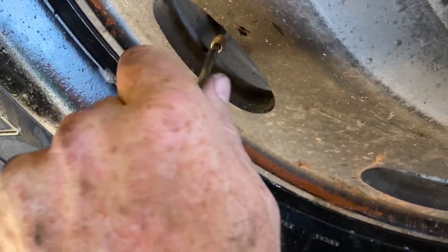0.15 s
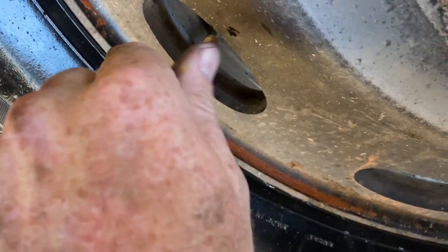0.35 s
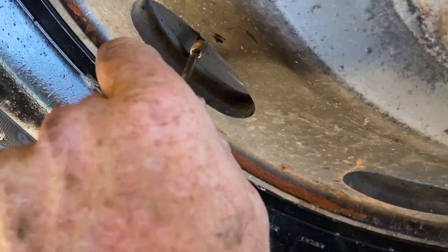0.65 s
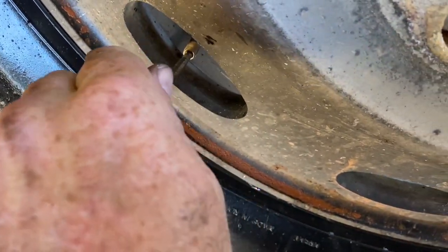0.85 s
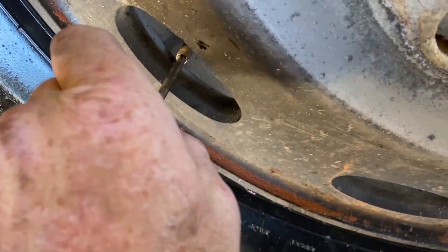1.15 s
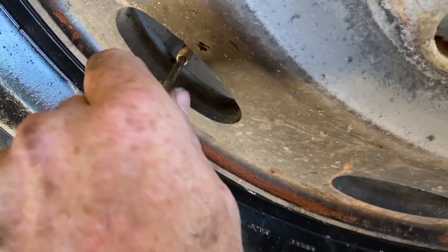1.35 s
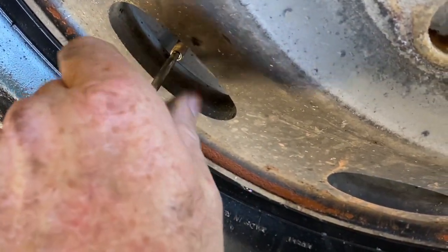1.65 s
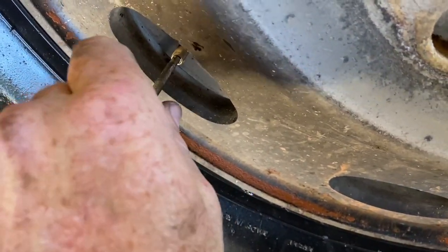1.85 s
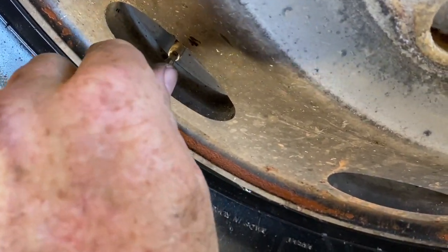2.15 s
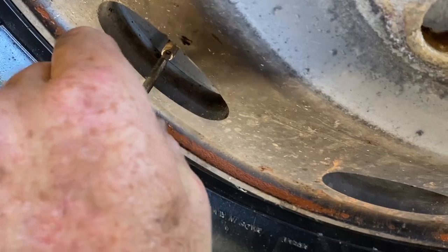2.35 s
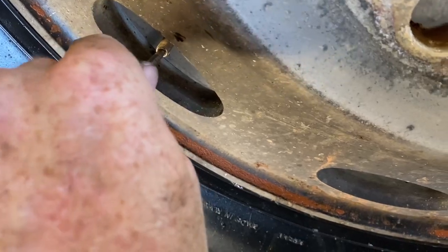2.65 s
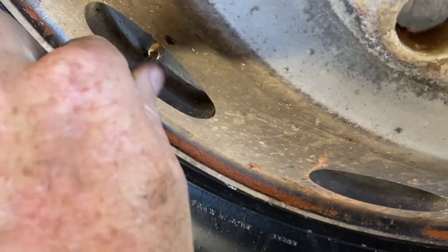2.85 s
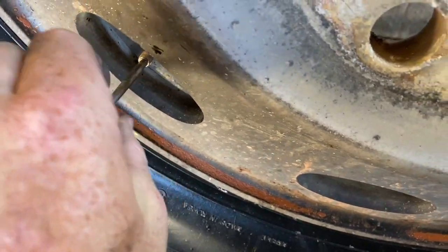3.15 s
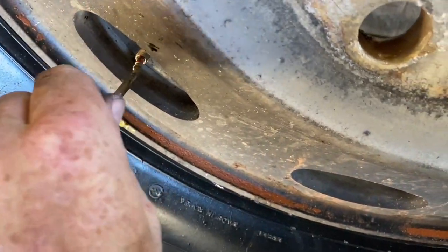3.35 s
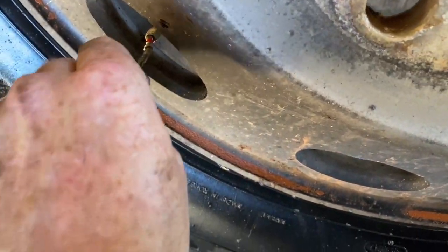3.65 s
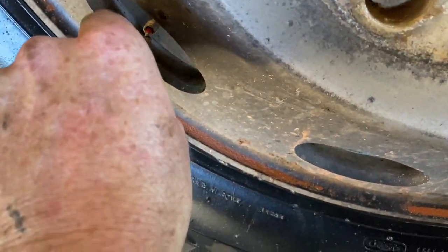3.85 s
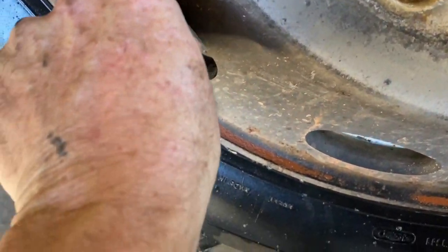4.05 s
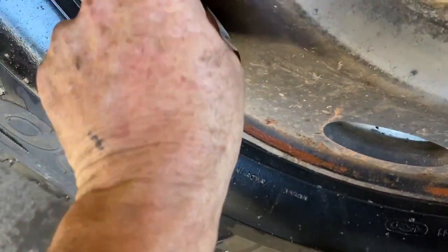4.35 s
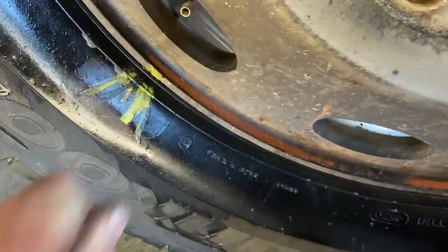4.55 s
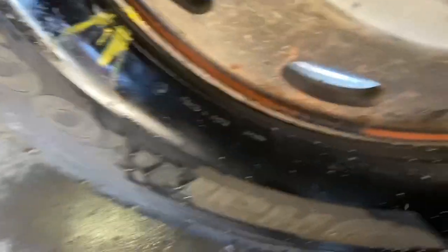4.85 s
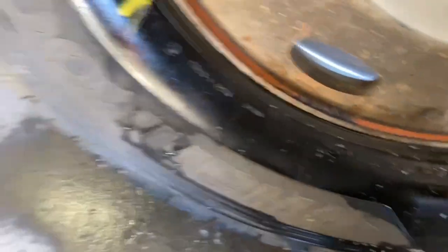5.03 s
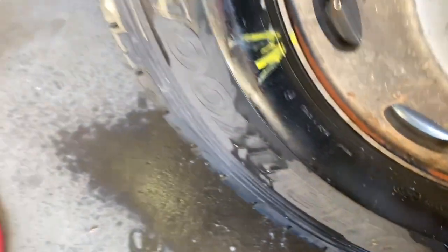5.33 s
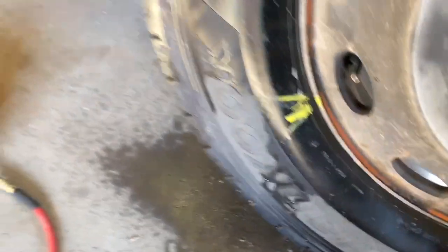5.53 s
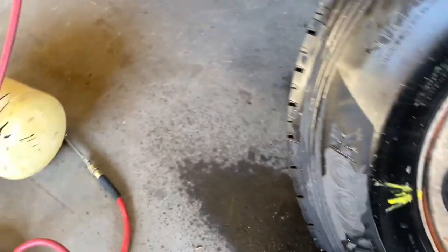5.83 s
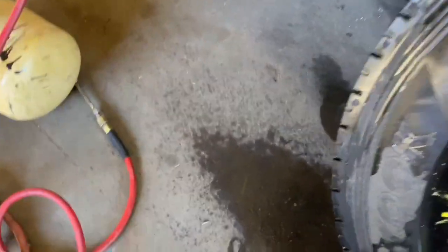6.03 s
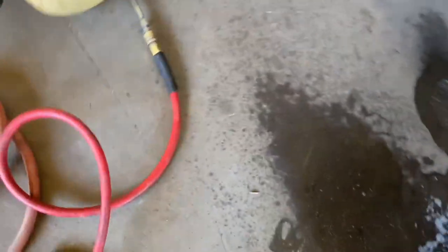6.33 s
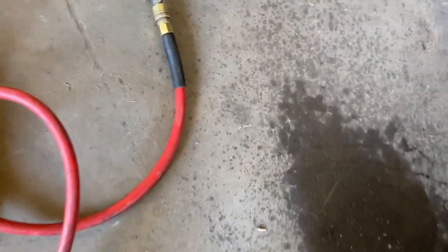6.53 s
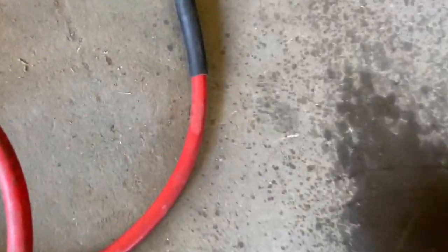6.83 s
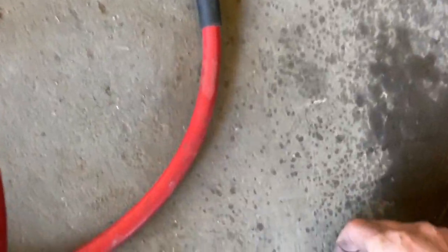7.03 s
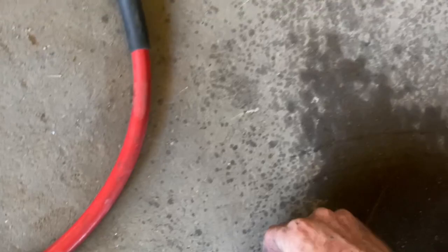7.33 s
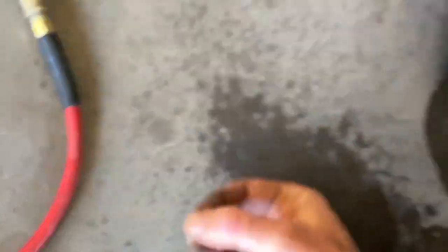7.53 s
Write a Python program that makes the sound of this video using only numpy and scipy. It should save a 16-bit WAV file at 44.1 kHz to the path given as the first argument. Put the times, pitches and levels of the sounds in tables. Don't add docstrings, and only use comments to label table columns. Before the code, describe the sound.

In a workshop, a valve core is twisted loose: spurting hiss, clicks, a pop, loud rushing air, a brief pinched squeal, then steady blowing.

```python
import sys
import numpy as np
from scipy import signal
from scipy.fft import rfft, irfft, next_fast_len
from scipy.io import wavfile
from scipy.ndimage import uniform_filter1d

SR = 44100
rng = np.random.default_rng(int(sys.argv[2]) if len(sys.argv) > 2 else 0)


def natural_amplitude(level_db):
    exponent = np.asarray(level_db, float) / 20
    return 10 ** exponent


def waveform_to_disk(signal):
    frames = np.transpose(np.atleast_2d(signal))
    scaled = np.clip(frames, -1, 1) * 32767
    samples = np.round(scaled).astype(np.int16)
    wavfile.write(sys.argv[1], SR, samples)


N = 338675
TIME = np.arange(N) / SR
SIZE = next_fast_len(N)
FREQ = np.arange(SIZE // 2 + 1) * SR / SIZE

# (time [s], flow as treble level [dB], opening of the stem [0-1],
# spread of the jet over wheel and floor [0-1], fullness [0-1])
VALVE_FLOW = [(0, -40, 0.37, 0.07, 0), (2.2, -34.5, 0.48, 0.13, 0.21), (2.5, -32.5, 0.23, 0.05, 0),
              (3.21, -34.5, 0.52, 0.15, 0.27), (3.28, -24, 0.74, 0.54, 1), (3.47, -24.5, 1, 0.8, 0.81),
              (3.87, -24.5, 1, 0.77, 0.77), (3.95, -29.5, 0.84, 0.8, 1.04), (4.0, -37.5, 0.6, 0.1, 1),
              (4.155, -37.5, 0.5, 0.1, 1.01), (4.17, -32, 0.5, 0.35, 1), (4.37, -33, 1, 0.8, 0.94),
              (4.4, -25.5, 0.8, .95, 0.53), (4.47, -26.5, .99, 1.1, 0.78), (4.5, -27, 0.98, 1.2, 1.04),
              (6.3, -30.5, 0.79, 1.04, 0.93), (7.5, -31.5, 1, .8, 1), (7.62, -27.5, 0.77, .6, 0.51)]
# (time [s], turn [0-1], loss [dB])
PHONE_TURN = [
    (0, 0.63, 0),
    (6.3, 0.19, 0),
    (6.5, 0, -4.5),
    (6.54, 1, -7),
    (6.62, 1, -9),
    (6.95, 0.85, -11.5),
    (7.48, 0.78, -9.5),
    (7.6, 0.6, -8.5),
    (7.68, 0, -6),
]


def curves(table):
    s, *columns = np.transpose(table)
    return [np.interp(TIME, s, column) for column in columns]


def walk(rate):
    hold = int(SR / rate)
    steps = np.repeat(rng.standard_normal(N // hold + 1), hold)[:N]
    return 1.3 * uniform_filter1d(uniform_filter1d(steps, hold), hold)


def bumps(table, attack, release):
    out = 0
    for s, length, *strengths in table:
        end = s + max(length, attack)
        corners = [s - attack / 2, s + attack / 2, end, end + release]
        out = out + np.outer(strengths, np.interp(TIME, corners, [0, 1, 1, 0]))
    return out


def gate(table, edge_s, offset=0):
    inside = np.minimum(TIME - table[0][0], table[-1][0] - TIME)
    return np.clip(inside / edge_s + offset, 0, 1)


def flow():
    # (time [s], length [s], extra hiss [dB], extra roar [dB])
    twists = [(0, 0.079, 4, 5), (0.141, 0.053, 4.5, 10), (0.201, 0.052, 9.5, 3.5), (0.715, .23, 8.5, 1),
              (0.797, 0.073, -1.5, 7.5), (0.882, 0.038, 3, 2), (1.03, 0.11, 10.5, 11.5),
              (1.176, 0.087, 2.5, 10.5), (1.267, 0.15, 8.5, 14), (1.33, 0.081, -0.5, -2.5),
              (1.43, 0.18, -0.1, 12.5), (1.646, 0.095, 4.5, 11), (1.741, 0.15, -2.5, 12.5),
              (1.98, 0.057, 2, 8), (2.123, 0.094, 1, 5.5), (2.3, 0.097, 1.5, 2.5), (2.352, 0.043, 3, 9),
              (2.413, 0.075, 0.8, 8), (2.496, 0.416, 2, 9.5), (2.988, 0.089, 2.5, 0),
              (3.136, .02, 0.5, 12.5), (3.207, 0.27, -0.5, 6), (3.26, 0.072, 2.5, -0.5),
              (3.981, 0.18, -1.7, -11.5), (4.218, 0.055, 4, -8), (4.378, .09, -0.5, -1),
              (4.496, 0.056, -0.7, 4), (7.541, .2, -0.8, 6), (7.6, .2, 1, 0), (1.357, .02, 3, -1.5)]
    # (time [s], level against the flow [dB])
    draught = [(0, -16), (.7, -11.5), (1.2, -11), (1.6, -20.5), (1.66, -34), (2.3, -28), (2.85, -12.5),
               (2.95, -14), (3.4, -18), (3.97, -18.5), (4.01, -33), (4.15, -40), (4.21, -7.5), (4.35, -27),
               (4.5, -9.5), (6.5, -10.5), (6.64, -28.5), (7.3, -29.5)]
    # (time [s], length [s], boost [dB])
    buffets = [(.247, 0.015, 10), (.838, 0.045, 17), (1.12, .03, -1), (1.28, 0.12, 15), (1.48, 0.037, 14),
               (1.55, 0.032, 11), (3.137, 0.04, 4.5), (3.26, 0.083, 12), (4.42, 0.034, 12.5),
               (5.0, 0.29, 5), (6.49, 0.065, 9.5), (6.74, 0.056, 4), (7.54, .03, 6.5), (7.61, 0.18, 12)]
    twist_attack_s, twist_release_s = 0.015, 0.036
    # against the treble for a thin leak and a full jet [dB], shares of hiss and roar,
    # start [s], length [s] and depth [dB] of the shadow as the phone turns (presence fades, then body drops out)
    middle_ranges = [(-12.5, 1, 0.98, 0.32, 6.36, .13, -4), (-18.5, -7, 0.45, 1.067, 6.505, .025, -14.5)]

    treble, _, _, full = curves(VALVE_FLOW)
    treble = treble + curves(PHONE_TURN)[1]
    shortened = [(s, length - twist_release_s / 2, a, b) for s, length, a, b in twists]
    hiss, roar = bumps(shortened, twist_attack_s, twist_release_s)
    middle = []
    for thin_db, full_db, hiss_share, roar_share, shadow_from_s, shadow_s, shadow_db in middle_ranges:
        db = treble + thin_db + full * (full_db - thin_db)
        db = db + hiss_share * hiss + roar_share * roar
        middle.append(db + shadow_db * np.clip((TIME - shadow_from_s) / shadow_s, 0, 1))
    rumble = treble + curves(draught)[0] + bumps(buffets, 0.014, 0.044)[0]
    return np.array([treble + hiss, *middle, rumble])


def spurts():
    # (time [s], boost [dB], length [s])
    slips = [(1.03, 2, 0.004), (1.044, 4, .004), (1.278, -5, .012), (1.987, 5, 0.025), (2.122, 6.5, 0.011),
             (2.134, 4, .003), (3.133, 10, 0.009), (1.191, 5.5, .005), (1.203, 1, .002), (1.413, 6, .005),
             (1.905, 1.5, 0.035), (2.179, -2.5, .012), (2.239, 8, .001), (2.241, 9, .0012), (2.28, 7, .001),
             (2.315, 3.5, .003), (2.613, 4.5, .0015), (2.69, 7.5, .002), (2.869, 2.5, 0.013),
             (4.51, 3, 0.0014), (3.221, 4.5, 0.034), (3.277, 3, 0.03), (4.164, 2, 0.024), (4.312, 2, 0.049)]
    out = 0
    for s, db, length in slips:
        since = np.maximum(TIME - s, 0)
        out = out + db * (TIME > s) * np.exp(-(since / length) ** 2)
    return out


def colour(table, hz, column=1):
    table = np.array(table)
    return np.interp(np.log(hz), np.log(table[:, 0]), table[:, column])


def jet(ranges):
    range_hz = [11500, 4200, 900, 130]
    range_width_hz = [6200, 5200, 1100, 300]
    # (pitch [Hz], level [dB])
    leak_colour = [(40, -2), (80, -1), (250, -3), (700, 4), (1050, -1), (1400, -4.5), (2000, -5.5),
                   (3300, -1.5), (5000, -1), (6200, -5.5), (7500, -4), (9500, 6.5), (11500, 2), (14000, 4)]
    open_colour = [(40, -8), (90, -1), (250, -0.5), (600, -2), (1500, 1.5), (2500, 2), (4000, 1),
                   (6000, -0.5), (7500, 1), (9200, 1), (11000, 2), (12700, -1), (14000, 0.5), (15500, 0)]
    # (pitch [Hz], level [dB])
    away_colour = [(40, -2), (120, 1.5), (400, -5), (1000, 0.2), (2200, -1.5), (3300, -1.5), (5000, 0.6),
                   (7300, 2.98), (12000, 0.16), (15500, 1.35)]
    # (pitch [Hz], share with the jet held narrow [0-1], share with it spread
    scatter = np.array([(39.9, .05, 0.26), (300, 0.043, 0.31), (900, 0.053, 0.73), (1380, 0.13, 0.93),
                        (1640, .015, 1), (1930, 0.018, 1), (2430, 1, 0.82), (2914, .03, 1),
                        (3700, .01, 0.64), (4550, 0.16, 1), (5010, 0.48, 0.75), (5900, 0.033, 0.428),
                        (6400, 0.0295, 0.67), (7100, 0.7, 0.91), (8000, .08, .25), (8250, .015, .06),
                        (8600, .01, .03), (9000, 0.03, 0.06), (9800, 0.0049, 0.0037),
                        (10340, 0.0022, 0.002)])
    # (time [s], length [s], pitch [Hz], width [Hz], level [dB])
    shadings = [(0, 0.87, 6540, 560, 5), (1.29, 0.12, 14000, 3000, 3), (.7, .22, 2000, 250, -6),
                (2.15, .75, 1800, 200, -4), (4.4, .2, 3100, 600, -2), (1.95, 0.21, 2230, 430, 6),
                (6.416, 0.086, 400, 330, 3), (2.96, 0.22, 13000, 3000, 3), (3.5, .03, 2650, 700, 3.5),
                (3.24, .035, 2400, 900, 3), (3.99, 0.15, 4400, 400, 1), (3, 0.56, 5870, 500, 1.5),
                (3, 0.69, 8970, 630, 5.5), (3.302, 0.78, 15000, 2500, -1), (3.354, 0.21, 1530, 400, 0),
                (4.5, 0.11, 6050, 500, 5.5), (5, 0.4, 6070, 500, 3), (4.5, .2, 3700, 640, 3.5),
                (4.178, .19, 1490, 330, 5.5), (6.193, 0.23, 520, 500, 2.5), (6.403, 0.15, 3200, 2200, -1.5),
                (0, .08, 5500, 1500, -1), (7, 0.87, 10000, 1300, -1.5), (6.551, 1, 1750, 420, -1.5),
                (6.863, 0.46, 370, 250, -4.5)]
    spit_db, flicker_db, gust_db, band_count = .6, 1.3, .5, 32

    density = ranges - 10 * np.log10(range_width_hz)[:, None]
    opening, spread = (np.clip(c, 0, 1) for c in curves(VALVE_FLOW)[1:3])
    turn = curves(PHONE_TURN)[0]
    noise = rfft(rng.standard_normal((3, SIZE))) * np.sqrt(SR / 2)
    pitch = np.log(FREQ + 300)
    centres = np.linspace(np.log(340), np.log(16300), band_count)
    spacing = centres[1] - centres[0]
    spit, gust, spurt = walk(70), walk(12), spurts()
    shades = np.array([bumps([(s, length, db)], .025, .025)[0] for s, length, _, _, db in shadings])
    shade_hz, shade_width = np.transpose(shadings)[2:4]

    straight, scattered = 0, 0
    for centre in centres:
        hz = np.exp(centre) - 300
        place = np.interp(-np.log(hz), -np.log(range_hz), np.arange(4))
        k = min(int(place), 2)
        db = density[k] + (place - k) * (density[k + 1] - density[k])
        leak_db, open_db = colour(leak_colour, hz), colour(open_colour, hz)
        db = db + leak_db + opening * (open_db - leak_db) + turn * colour(away_colour, hz)
        db = db + np.exp(-((hz - shade_hz) / shade_width) ** 2) @ shades
        db = db + spit_db * (1 - .5 * turn) * spit + spurt
        db = db + gust_db * gust * place / 3 + flicker_db * walk(45)
        window = np.cos(np.pi / 2 * np.clip((pitch - centre) / spacing, -1, 1)) ** 2
        band = natural_amplitude(db) * irfft(noise * window, SIZE)[:, :N]
        shut, wide = (np.interp(hz, scatter[:, 0], scatter[:, c]) for c in (1, 2))
        share = np.clip(shut + spread * (wide - shut), 0, 1)
        straight = straight + np.sqrt(1 - share) * band[0]
        scattered = scattered + np.sqrt(share) * band[1:]
    return straight, scattered


def stem(body):
    hz, width_hz, db = 1376, 106, -0.42
    resonance = np.exp(-((FREQ - hz) / width_hz) ** 2)
    air = irfft(rfft(rng.standard_normal(SIZE)) * resonance, SIZE)[:N]
    shut = 1 - np.clip(curves(VALVE_FLOW)[1], 0, 1)
    return shut * natural_amplitude(body + db) * air / air.std()


def squeals():
    # (time [s], pitch [Hz], level of partials 1, 2, 3 [dB])
    pinches = [
        [(1.045, 1012, -29, -32, -48), (1.055, 1008, -24.5, -33, -47), (1.069, 1000, -25, -31, -37.5),
         (1.085, 1006, -24, -37, -42), (1.097, 1020, -27, -45, -42)],
        [(4.19, 773, -57, -44, -52), (4.206, 810, -29.5, -55, -42), (4.218, 850, -31, -40, -42),
         (4.224, 895, -31, -17, -40), (4.232, 916, -34, -23.5, -42), (4.239, 1010, -42, -19, -45),
         (4.25, 1127, -34, -30.5, -47), (4.262, 1136, -26, -25, -51.5), (4.282, 1154, -21, -28.5, -48.5),
         (4.294, 1249, -15, -53, -44), (4.306, 1257, -14.5, -43.5, -44), (4.314, 1180, -22, -43.5, -38),
         (4.33, 1336, -23, -45, -50), (4.344, 1044, -46, -38, -40), (4.366, 883, -36, -48, -46),
         (4.374, 815, -27.5, -55, -48), (4.39, 824, -43, -53, -58)],
    ]
    waver, shake_db = 0.0074, 0.87
    out = 0
    for table in pinches:
        hz, *levels = curves(table)
        for step_db in (2.5, -3, -1.5):
            levels.append(table_top(levels) + step_db)
        phase = 2 * np.pi * np.cumsum(hz * (1 + waver * walk(150))) / SR
        opened = gate(table, .002, .5)
        for k, db in enumerate(levels):
            shaken_db = db + shake_db * (0.8 + 1.1 * k) * walk(150)
            out = out + opened * natural_amplitude(shaken_db) * np.sqrt(2) * np.sin((k + 1) * phase)
    return out


def table_top(levels):
    return levels[2]


def hollow(table, waver, shake_db, rate):
    hz, db = curves(table)
    level = gate(table, 0.01) * natural_amplitude(db + shake_db * walk(rate))
    return level * np.sin(2 * np.pi * np.cumsum(hz * (1 + waver * walk(rate))) / SR)


def whoop():
    # (time [s], pitch [Hz], level [dB])
    rise = [(3.31, 520, -38), (3.334, 470, -27), (3.36, 558, -28), (3.386, 569, -26.5), (3.426, 750, -54),
            (3.46, 720, -38)]
    return hollow(rise, waver=0.13, shake_db=-3.5, rate=260)


def rasp():
    # (time [s], pitch [Hz], level [dB])
    high = [(4.305, 3700, -36), (4.313, 3650, -25), (4.333, 3800, -22.5), (4.35, 3210, -36),
            (4.363, 3070, -29), (4.372, 3100, -37)]
    middle = [(4.316, 2880, -38), (4.33, 2995, -30), (4.342, 3350, -29), (4.354, 3000, -36)]
    early = [(4.208, 3500, -40), (4.226, 3700, -28), (4.238, 3950, -34), (4.246, 3500, -48),
             (4.28, 3520, -40), (4.295, 3750, -30), (4.306, 3780, -36)]
    low = [(4.312, 1124, -42), (4.335, 1012, -26.5), (4.368, 900, -29)]
    out = hollow(high, waver=0.1, shake_db=2.0, rate=670)
    out = out + hollow(low, waver=0.2, shake_db=-0.5, rate=720)
    out = out + hollow(middle, waver=.1, shake_db=4.0, rate=600)
    return out + hollow(early, waver=.02, shake_db=2.5, rate=300)


def knocks():
    # (time [s], peak [dB], ring [Hz], thump relative to peak [dB], ring length [cycles])
    hits = [(1.1315, -27.5, 870, -10, 1.2), (1.188, -34.5, 736, -20, 1.7), (1.275, -26, 654, -20, 1.2),
            (1.352, -14.5, 450, -28, 1.33), (1.391, -35, 511, -8, 1), (1.4111, -13, 700, -31, 1.25),
            (1.489, -20.5, 537, -5.5, 1.4), (1.496, -22.5, 680, -21, 2.3), (1.566, -25, 316, -16, 0.52),
            (3.1325, -19, 900, -18, 0.66), (3.1338, -22, 804, -19, 2.3), (3.2721, -9, 660, -30, 0.7),
            (3.3155, -16, 624, -25, 1.6), (4.441, -26.5, 355, -5, 3.1), (4.467, -28.5, 203, -8, 0.52),
            (1.5738, -28, 800, -30, 1)]
    thump_hz, thump_s, sag, sag_s = 139, 0.0052, 2.5, 0.0036
    crack_db, crack_s, rattle_db, rattle_s = -12, 0.0026, -9, 0.0044
    out, t = np.zeros(N), np.arange(SR // 8) / SR
    rattle_band = signal.butter(2, [250, 1500], "bandpass", fs=SR, output="sos")
    rattles = signal.sosfilt(rattle_band, rng.standard_normal((len(hits), len(t))))
    cracks = rng.standard_normal((len(hits), len(t)))
    thump_turns = thump_hz * (t + sag * sag_s * (1 - np.exp(-t / sag_s)))
    thump = np.e * t / thump_s * np.exp(-t / thump_s) * np.sin(2 * np.pi * thump_turns)
    for (s, db, hz, thump_db, cycles), rattle, crack in zip(hits, rattles, cracks):
        u = t * hz / max(cycles, .2)
        hit = (u * np.exp(1 - u)) ** 3 * np.sin(2 * np.pi * hz * t)
        hit = hit + natural_amplitude(crack_db) * crack * np.exp(-t / crack_s)
        hit = hit + natural_amplitude(rattle_db) * 4 * rattle * np.exp(-t / rattle_s)
        hit = hit + natural_amplitude(thump_db) * thump
        start = int(s * SR)
        out[start:start + len(t)] += natural_amplitude(db) * hit
    return out


def pops():
    # (time [s], peak [dB], first pitch above the last [Hz], last pitch [Hz], length [s])
    pushes = [(0.2467, -28, 800, 125, 0.0075), (.8395, -31.5, 400, 300, .002),
              (3.1328, -24, 500, 2900, 0.004), (3.1325, -29, 300, 6500, .002),
              (3.139, -31, 300, 5600, .002), (1.045, -18, 2400, 570, 0.0016), (.8418, -21, 260, 70, 0.018),
              (.8562, -24, 92, 54.6, 0.018), (1.3915, -29, 200, 48, 0.014), (1.568, -25, 698, 130, 0.0064),
              (1.5735, -26.5, 200, 80, 0.011), (3.2721, -11, 462, 62, .0155), (4.466, -25.5, 60, 140, .012),
              (4.355, -23.5, -300, 3100, 0.009)]
    punch, fall_share = 0.76, 0.256
    out, t = np.zeros(N), np.arange(SR // 6) / SR
    for s, db, first_hz, last_hz, length in pushes:
        fall = fall_share * length
        turns = last_hz * t + first_hz * fall * (1 - np.exp(-t / fall))
        envelope = (1 + punch * np.exp(-t / fall / 2)) * np.exp(-t / length)
        start = int(s * SR)
        out[start:start + len(t)] += natural_amplitude(db) * envelope * np.sin(2 * np.pi * turns)
    return out


def ports(x, shift=0, dwell=.8):
    # (pitch [Hz], left minus right [dB])
    balance = [(0, 0.8), (900, 2.5), (1500, -2), (1850, 4), (2300, 2.5), (3000, 3), (3700, 1), (4550, 9.5),
               (5250, 6), (5800, -3.5), (6250, 15), (6550, 2), (6900, -1.5), (8000, 3.5), (8300, 1.3),
               (8650, .5), (9200, -4.5), (10000, 0.4), (15900, 0)]
    # (pitch [Hz], lead of the left port [cycles])
    left_lead = [(0, 0), (1300, .17), (1700, .44), (2000, .54), (2700, .9), (3400, 1), (4100, 1.12),
                 (4550, 1.5), (5000, 1.68), (5750, 1.94), (6250, 2), (6800, 2.12), (7700, 2.34),
                 (8150, 2.41), (8450, 2.5), (8750, 2.37), (8950, 2.27), (9500, 2.15), (10100, 2),
                 (10500, 1.9), (11200, 1.7), (11380, 1.6), (12050, 1.5), (12680, 1.4), (12850, 1.3),
                 (13500, 1.11), (14050, 1), (14550, .88), (14950, .72), (15150, .62), (15900, .5)]
    # (pitch [Hz], share of the wavering [0-1.4])
    sway_share = [(6000, 0), (8400, .8), (10100, .4), (12000, 1), (14000, .6), (15500, 1.4)]
    tilted_hz = FREQ * (1 - shift * np.exp(-((FREQ - 1900) / 800) ** 2))
    lead = np.interp(tilted_hz, *np.transpose(left_lead))
    lead = lead - dwell * np.sin(4 * np.pi * lead) / (4 * np.pi) * (FREQ > 2500)
    shaded_db = shift * 70 * np.exp(-((FREQ - 4550) / 400) ** 2)
    balance_db = np.interp(FREQ, *np.transpose(balance)) + shaded_db
    half = natural_amplitude(balance_db / 2) * np.exp(1j * np.pi * lead)
    both = rfft(x, SIZE) * np.array([half, 1 / half])
    quarter_turn = np.array([[1j], [-1j]]) * np.interp(FREQ, *np.transpose(sway_share))
    turned = irfft(both * quarter_turn, SIZE)[:, :N]
    sway_cycles = .027 * walk(25) + bumps([(3.645, .025, .11)], .01, .01)[0]
    return irfft(both, SIZE)[:, :N] + np.pi * sway_cycles * turned


def motor():
    # (pitch [Hz], rms level [dB])
    hum_lines = [(75.4, -55.5), (150.7, -57), (226.1, -60.5), (371.4, -70), (452.2, -79), (678.3, -70.5)]
    # (time [s], length [s], extra level [dB])
    load = [
        (.28, .57, 14),
    ]
    idle_db, wind_down_from_s, wind_down_db_s = -13, 1.7, -6
    lines = 0
    for hz, db in hum_lines:
        turns = hz * TIME + 0.16 * rng.random()
        lines = lines + natural_amplitude(db) * np.sqrt(2) * np.cos(2 * np.pi * turns)
    fade = wind_down_db_s * np.maximum(TIME - wind_down_from_s, 0)
    return natural_amplitude(idle_db + bumps(load, .06, .06)[0] + fade + 1.2 * walk(4.6)) * lines


def scene():
    ranges = flow()
    straight, scattered = jet(ranges)
    squeal = squeals()
    rim = natural_amplitude(-2.5) * np.array([np.roll(squeal, 9), 0 * squeal])
    valve = straight + stem(ranges[2]) + squeal + whoop() + rasp() + knocks() + pops()
    tilt = np.interp(TIME, (.95, 1.15), [1, 0])
    heard = ports(tilt * valve, shift=.1, dwell=.97) + ports((1 - tilt) * valve)
    return heard + rim + scattered + motor()


def band_limit(x):
    return signal.sosfilt(signal.butter(12, 15940, fs=SR, output="sos"), x)


def record(dry):
    bass_cut = signal.butter(2, 45, "highpass", fs=SR, output="sos")
    top_cut = signal.ellip(8, .2, 60, 15680, fs=SR, output="sos")
    phone = signal.sosfilt(top_cut, signal.sosfilt(bass_cut, dry))
    return band_limit(phone)


dry = scene()
out = record(dry)
waveform_to_disk(out)
```